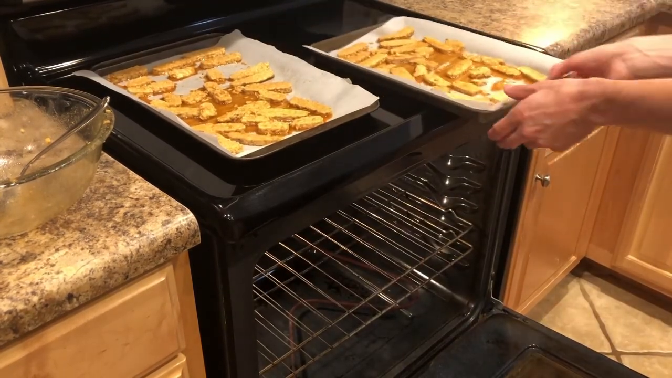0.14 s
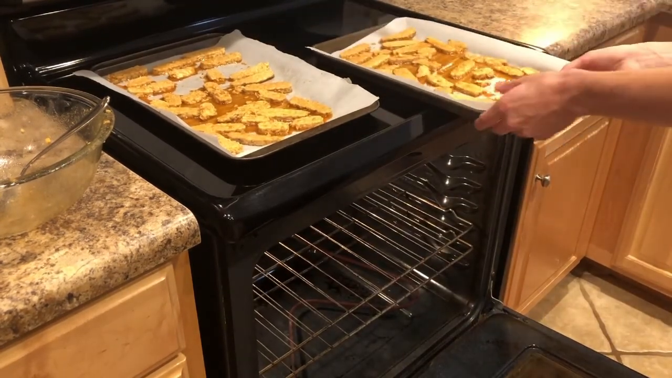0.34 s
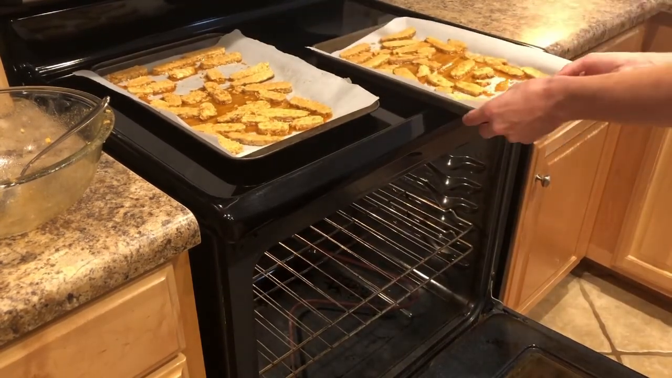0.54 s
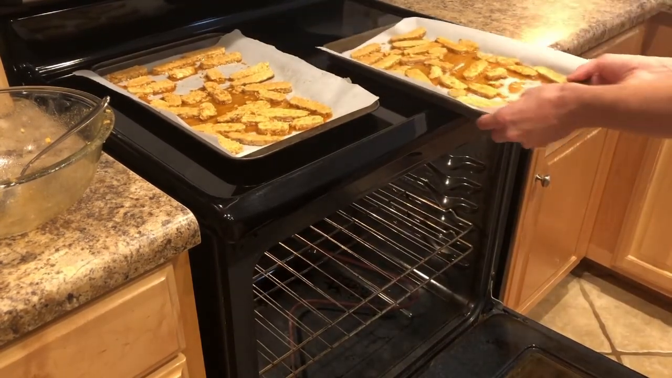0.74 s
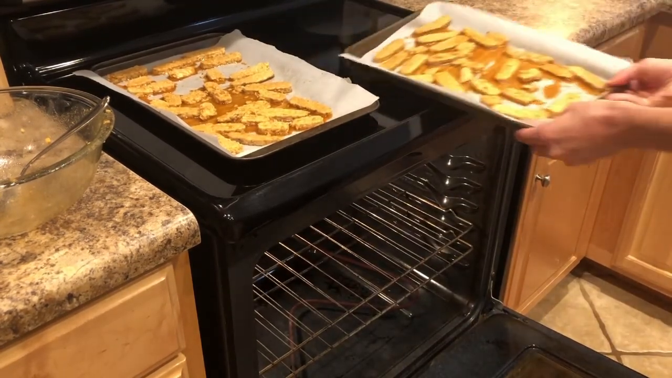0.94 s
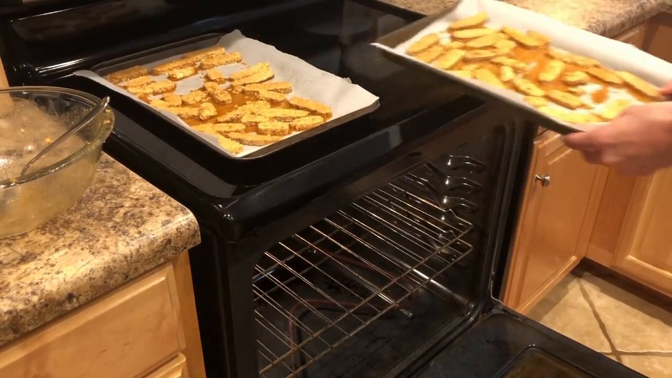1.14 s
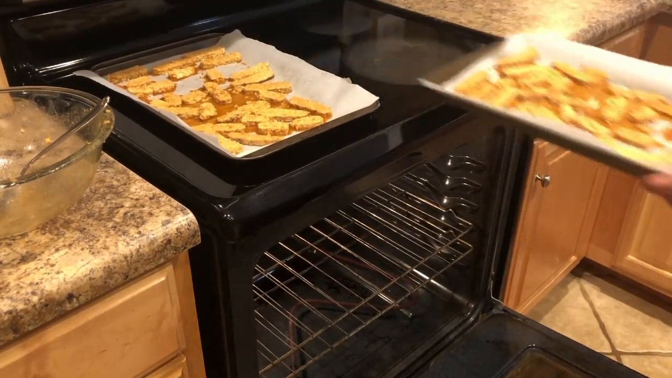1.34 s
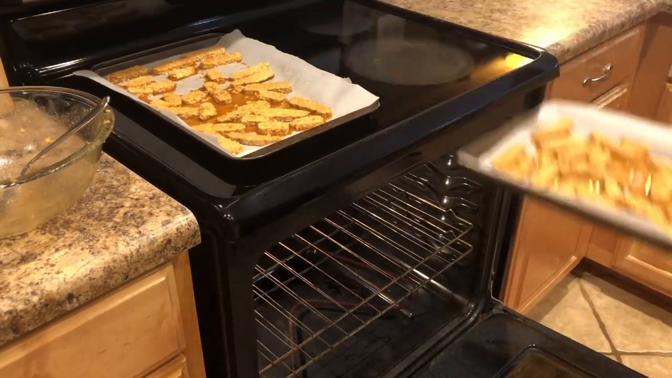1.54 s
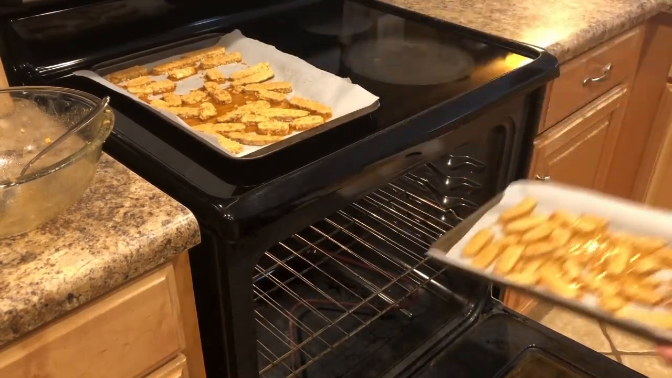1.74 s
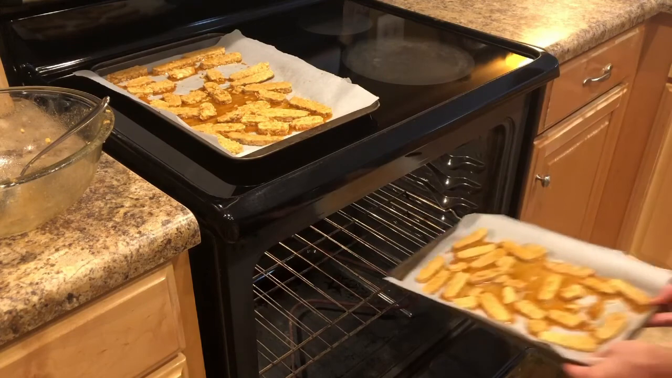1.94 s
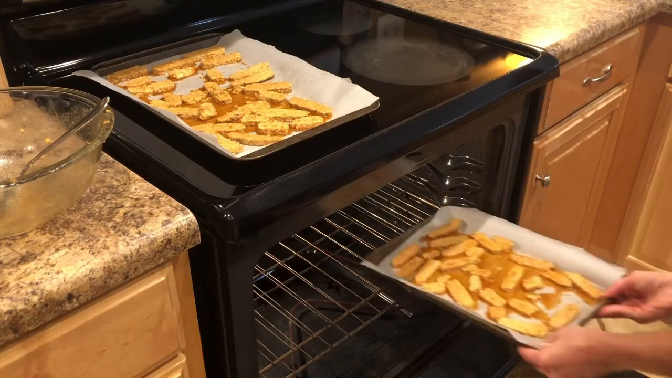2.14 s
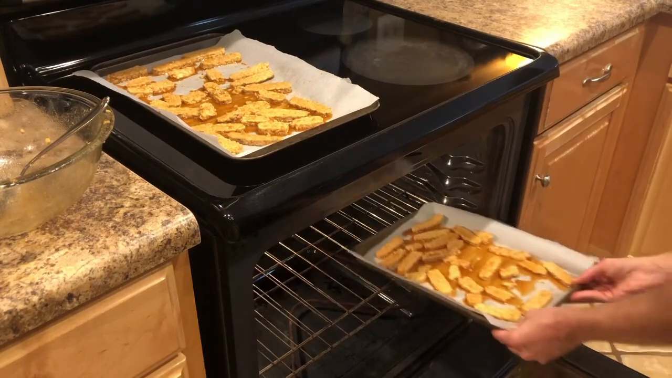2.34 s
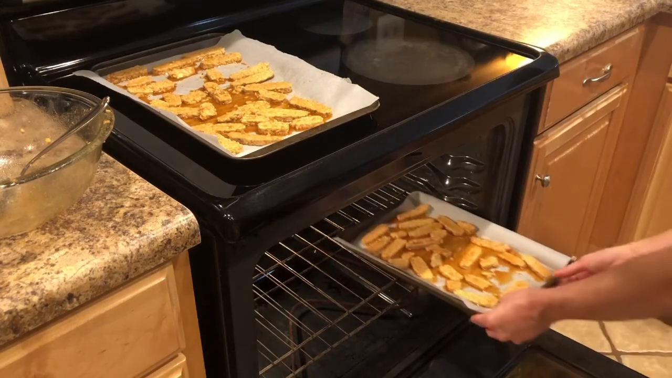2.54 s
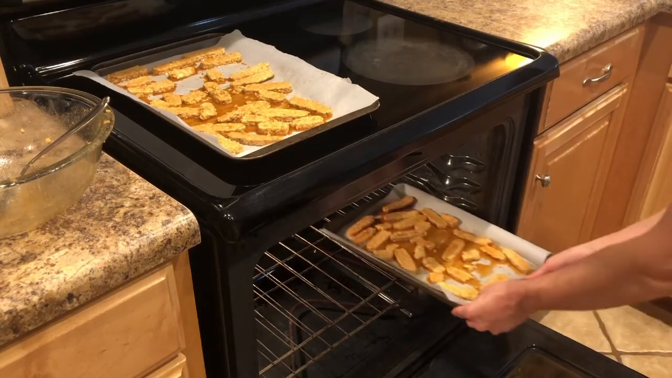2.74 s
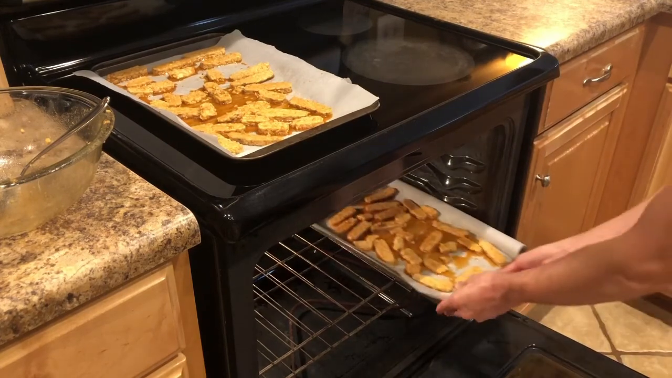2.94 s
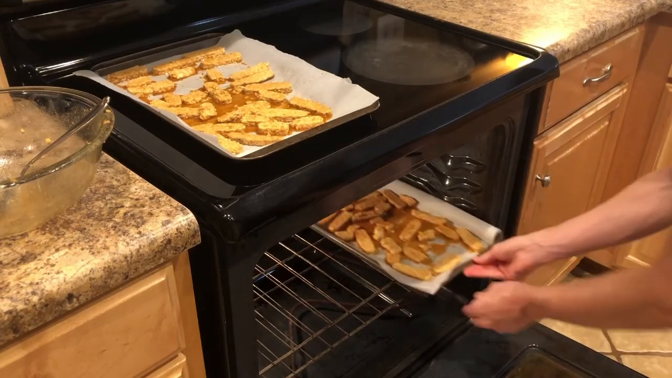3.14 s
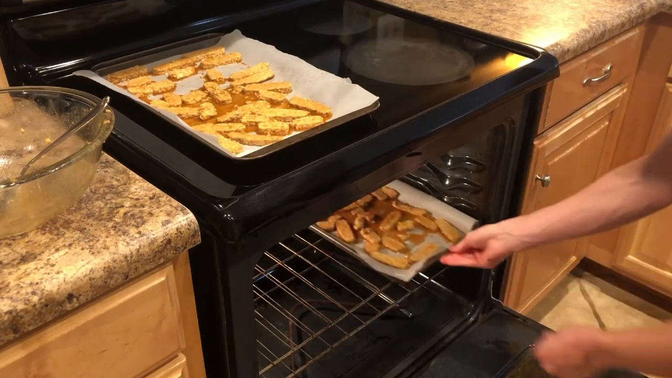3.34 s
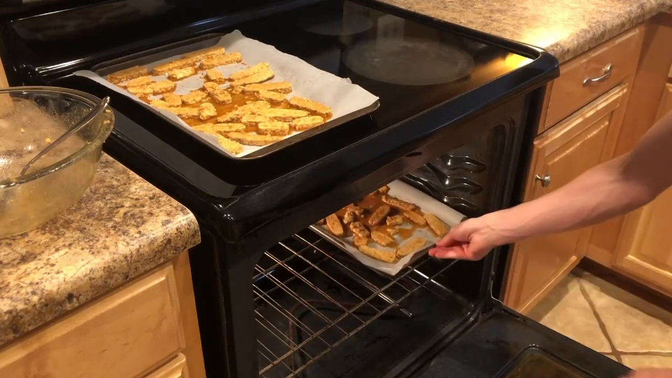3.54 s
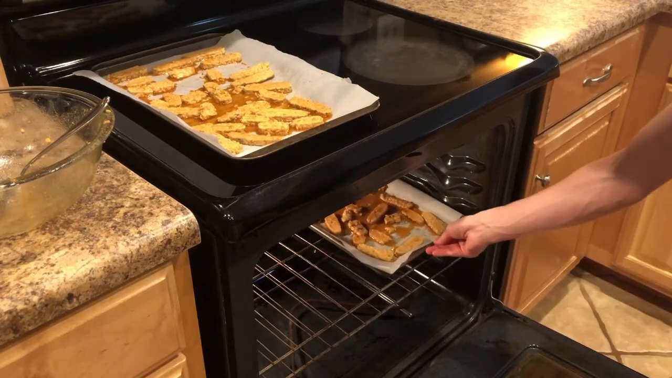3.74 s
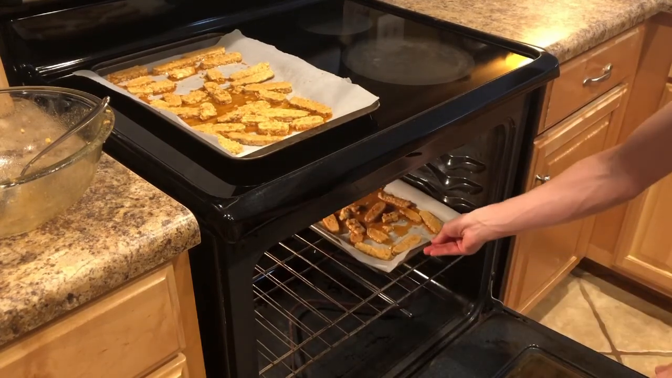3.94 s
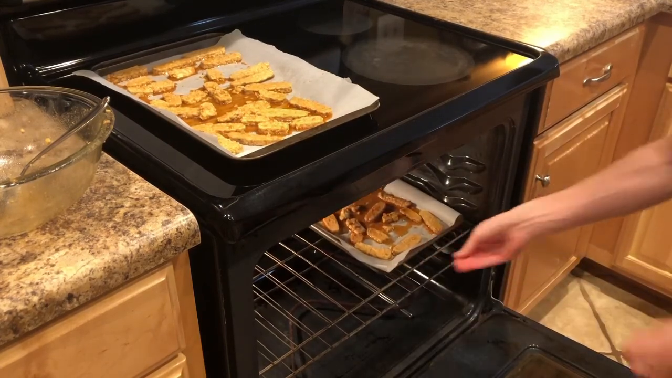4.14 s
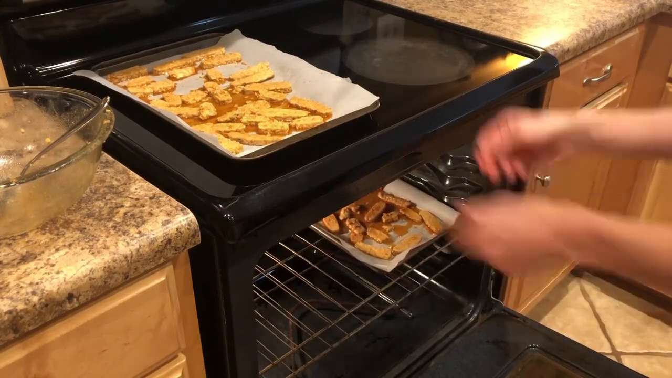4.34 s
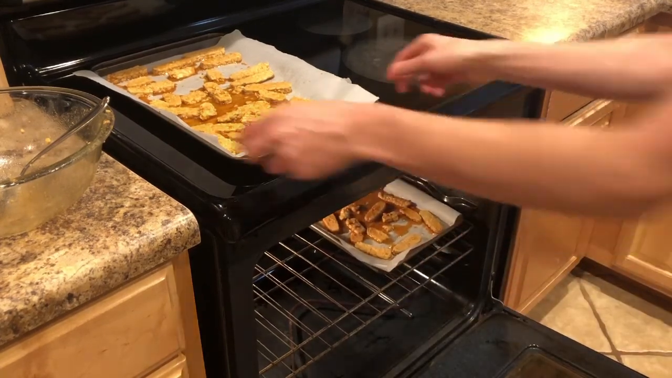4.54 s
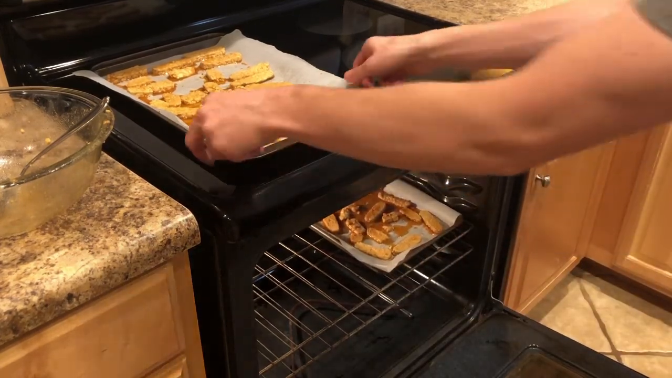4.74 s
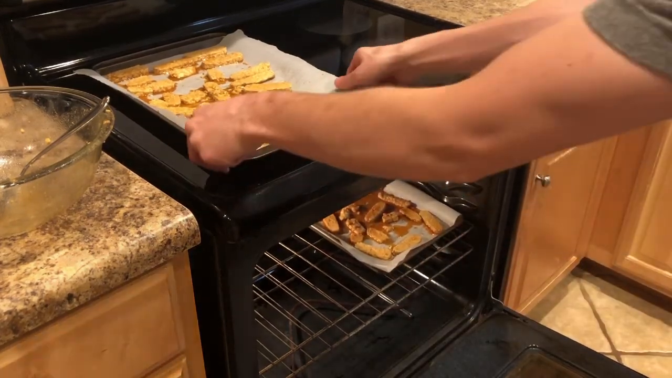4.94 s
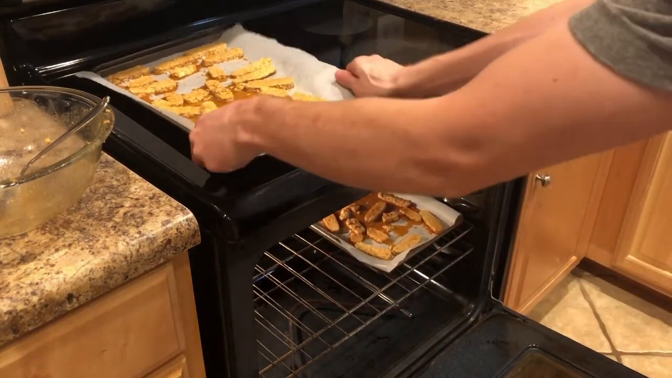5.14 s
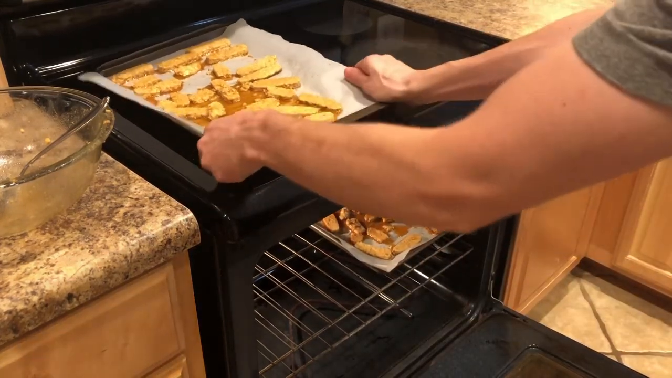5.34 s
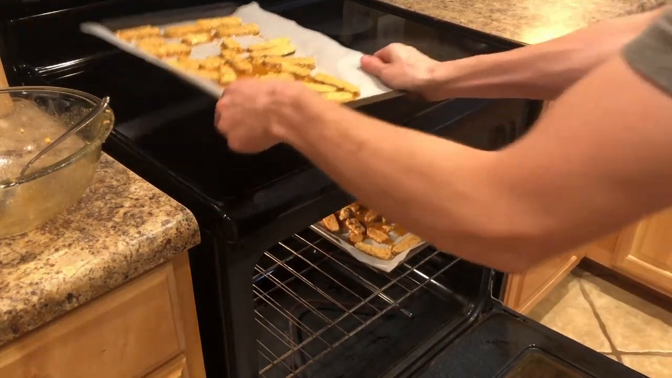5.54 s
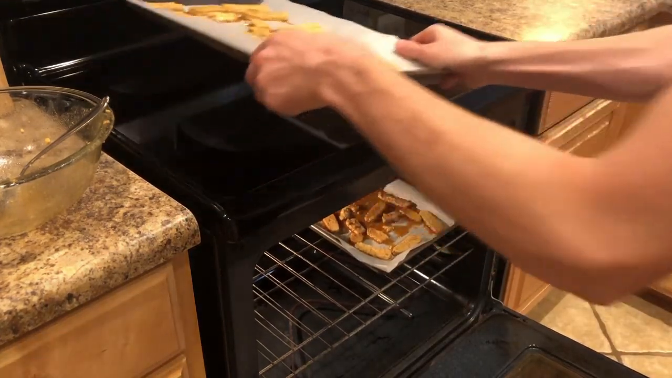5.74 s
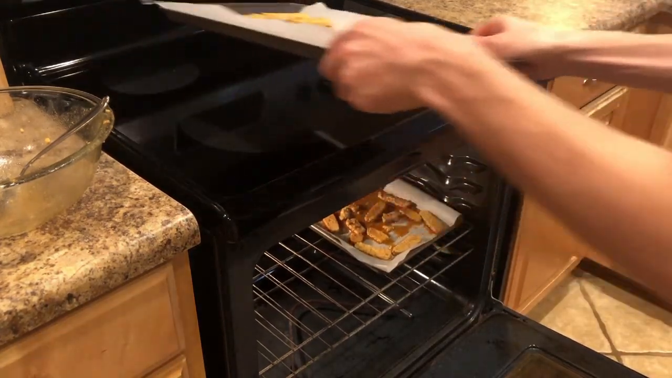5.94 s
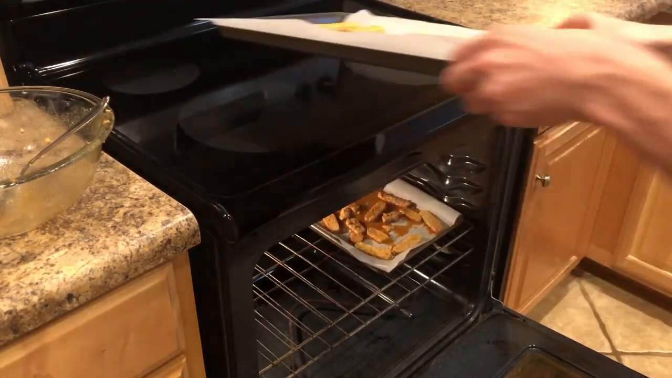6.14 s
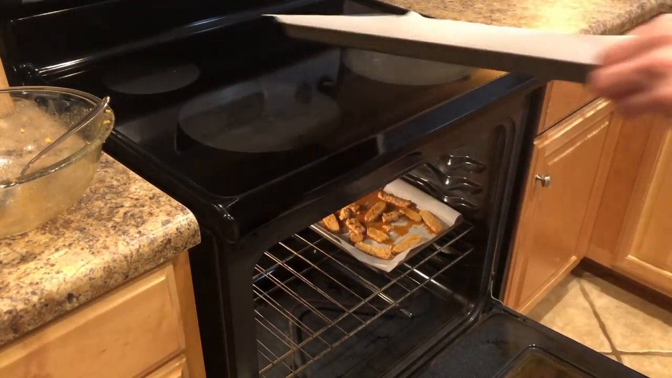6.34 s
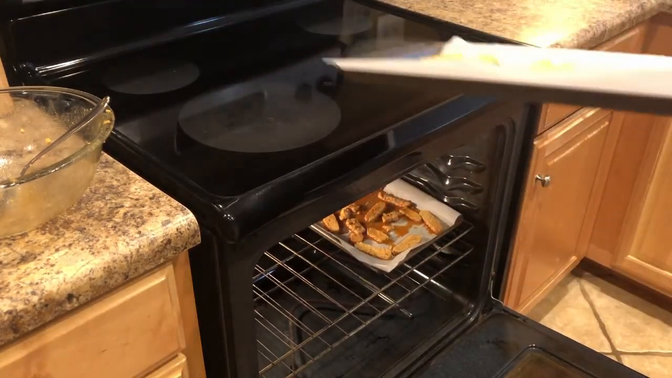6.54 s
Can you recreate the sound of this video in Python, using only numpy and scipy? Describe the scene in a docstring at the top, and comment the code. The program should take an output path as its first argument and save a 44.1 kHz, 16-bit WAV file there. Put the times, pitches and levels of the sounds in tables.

```python
"""A small kitchen, 6.6 s in mono, close by: baking sheets lined with paper go from a glass hob into an oven.
First metal knocks and short scrapes on the hob, built from noisy contact bursts, and light paper snaps.
From 2.3 s hard knocks and slides on the wire rack, also ringing the sheet and oven walls as decaying modes.
A finger, heard faintly at 1.2 s, squeaks at 4.7 s as a gliding tone; then paper crackles in noisy snaps.
Throughout, a room tail of sparse taps, filtered noise for air and the wavering sines of an appliance hum."""
import sys
import numpy as np
from scipy import signal
from scipy.fft import rfft, irfft
from scipy.io import wavfile
from scipy.ndimage import uniform_filter1d

SR = 44100
rng = np.random.default_rng(int(sys.argv[2]) if len(sys.argv) > 2 else 0)


def unload_audio(sound):
    """Save the sound as a 16-bit wav file, at the path given as the first command line argument."""
    columns = np.transpose(np.atleast_2d(sound))
    # keep every value between -1 and 1, then stretch to whole-number steps
    steps = np.round(np.clip(columns, -1, 1) * 32767)
    wavfile.write(sys.argv[1], SR, steps.astype(np.int16))


N = 290619  # samples

# Levels in the tables are relative: the functions and the mix set the final balance.
# metal on rack or hob: start_s, level_db, centre_hz, low part weight_db, bright edge_db, rattle t60_s
KNOCKS = [(0.0074, -23, 1430, -3, -48, 0.083), (0.169, -31, 3880, -13, -8.5, 0.11),
          (0.613, -41, 2460, -36.5, -11, 0.21), (0.634, -45.5, 1400, -31, 7.5, 0.06),
          (0.6591, -43, 1350, -31, -8, 0.2), (0.9597, -37.5, 1750, -2, -17.5, 0.068),
          (1.009, -28, 2060, -16, -11.5, 0.038), (2.3148, -19.5, 3470, -20, 0.5, 0.14),
          (2.337, -9.5, 3350, -20, -5, 0.18), (2.3583, -10.5, 2480, -14, -29.5, 0.14),
          (2.3846, -17, 1394, -13, -4.5, 0.51), (2.4259, -11, 4150, -35, -3.5, 0.091),
          (2.4449, -22, 3460, -24, -9, 0.33), (2.7829, -30, 2500, -5, -2, 0.037),
          (2.9383, -27, 2220, -15.5, -7, 0.039), (3.0825, -16.5, 3140, -11.5, -15.5, 0.16),
          (3.173, -30.5, 2900, -22, -2, 0.1), (3.2603, -28, 1890, -19, -19, 0.053),
          (3.3496, -27.5, 3480, -19, -2.5, 0.055), (3.3747, -25, 3740, -44, 3, 0.042),
          (3.5332, -25, 3700, -6.5, -11.5, 0.082), (3.8375, -34, 1500, -11.5, -36, 0.22),
          (3.967, -23, 1520, -16.5, -27, 0.097), (5.1685, -30.5, 1130, -4, -25, 0.091),
          (5.2799, -28.5, 1070, -4, -32.5, 0.075), (6.2925, -28, 2947, -17, -8.5, 0.038)]
# low part of a knock: frequency_hz, level_db
WEIGHT = [(90, -21), (150, -2.5), (400, 2.5), (800, -8), (1300, -19)]
# blows that swing the panel: start_s, level_db, favoured_hz, reach_octaves (6 dB down there)
THUDS = [(.01, -33.5, 825, .1), (.012, -35.5, 392, 0.11), (.012, -35, 1746, .1), (0.17, -33.5, 180, 0.068),
         (.66, -43.5, 158, 0.15), (.9, -43, 158, 0.21), (.958, -31, 260, .1), (.975, -41, 161, 0.17),
         (.96, -47, 1746, .1), (1.013, -45.5, 825, .1), (2.316, -26, 3500, 0.09),
         (2.338, -19.5, 3500, 0.091), (2.427, -25.5, 3600, 0.089), (2.361, -31, 128, .1),
         (2.379, -26.5, 535, .1), (2.431, -31, 392, 0.114), (2.49, -30, 825, .1), (2.655, -38, 128, 0.087),
         (2.657, -31, 260, 0.118), (2.702, -41, 158, 0.12), (3.089, -39, 335, 0.086), (3.541, -45, 335, .1),
         (3.97, -47, 2870, .1), (4.049, -45, 140.3, 0.31), (5.169, -38, 1113, .1), (5.284, -43.5, 535, .1),
         (5.289, -42, 158, 0.14)]
# clear swings of the flat of the sheet: frequency_hz, t60_s on the rack
PANEL = [(128, 0.26), (158, 0.25), (180, 0.35), (260, 0.095), (335, .18), (392, 0.22), (535, 0.14),
         (825, 0.22), (1113, 0.11), (1746, 0.24), (2870, 0.29), (3400, .12), (3620, .12)]
# sheet and rack ringing together: frequency_hz, level_db, t60_s
SHEET_MODES = [(380, -4, 5.0), (510.6, -3, 0.29), (850, -9, 5.0), (1010, 2.5, 0.87), (1516, -4.5, 0.83),
               (1800, 4, 0.41), (2064, -12, 0.31), (2190, -3.5, 0.46), (2814, -0.5, 0.41),
               (3070, -12, 0.85), (3537, -20.5, 0.25), (3440, -36.5, 1.2), (3420, -6.5, 0.72),
               (3740, 0, 0.2), (3800, 0.5, 0.52), (3820, -6, 0.52), (4526, -19, 0.49), (4940, -17, 0.55),
               (5100, -16, 0.55), (5260, -14, 0.83), (5330, -21, 0.68), (5940, -7.5, 0.33),
               (6800, -24, 0.38), (6520, -11, 0.37), (7100, -11, 0.16), (7149, -15, 0.42), (7990, -8, 0.21),
               (7400, -14, 0.53), (7300, -6, 0.16), (7450, -25, 0.38)]
# walls of the oven: frequency_hz, level_db, t60_s
OVEN_MODES = [(158.4, -15.5, 0.22), (273, -3.5, 0.18), (327, -1, .5), (490, -9.5, .3), (733, 0, 0.36)]
# strokes of sheet or paper over rack and hob: full_at_s, hold_s, swell_db_per_s, fade_db_per_s,
# scrape_db, rumble_db and edge_db (both relative to the scrape)
STROKES = [(0.071, 0.0147, 144, 142, -50, -2.5, -5), (0.222, 0.0084, 77, 221, -48, -7.5, -7.5),
           (0.39, 0.049, 400., 200., -77.5, 3, 6), (0.682, 0.042, 176, 41, -73, 7.5, -20),
           (0.88, .01, 104, 110., -53, -23, -7.5), (1.08, 0.055, 100., 57, -70.5, -5, -12),
           (1.257, 0.057, 500., 120., -70.5, -12, -30), (2.458, 0.035, 394, 350., -33.5, -6.5, -8),
           (2.577, 0.021, 108, 20.5, -43, -1.5, -4.5), (3.154, 0.087, 49, 77, -44, -3.5, 0),
           (3.44, .09, 60., 200., -51, -19, -2), (3.554, 0.012, 400., 119, -50.5, 5, -32),
           (3.81, .07, 152, 134, -59, 2.5, -8), (3.992, 0.0176, 400., 37.5, -62, 10, -12),
           (4.838, 0.028, 299.5, 58, -64.5, 2.5, -1), (5.04, 0.047, 100., 103, -62.5, -1.5, -2),
           (5.187, .005, 900., 900., -47, -16, 1), (5.24, 0.09, 100., 70., -63.5, 8, -6),
           (5.78, 0.14, 18, 33.5, -69, -16, -2), (6.283, 0.021, 29, 59.5, -68, 1, -5)]
# spectra of the scraping and of its low rumble: frequency_hz, level_db
SCRAPE = [(410, -27.5), (700, 3), (778, -18), (874, -3.5), (1160, 1), (2650, 4.5), (3300, 5.5), (7000, -10),
          (9100, -62), (15400, -120)]
RUMBLE = [(41, -39), (70, -19.5), (130, 7), (230, -5), (268, 5.5), (522, -1.5), (581, -7), (850, -3),
          (1200, -14.5), (1560, -12), (2640, -120)]
# bright edge of knocks, snaps and strokes: frequency_hz, level_db
EDGE = [(3240, -12.5), (5500, -2), (6670, 0), (8320, -2.5), (15100, -5.5), (16100, 0), (16500, -52.5)]
# paper snaps and light ticks: start_s, level_db, centre_hz, bright edge_db
SNAPS = [(0.8803, -39.5, 1900, -8), (1.25, -41.5, 1770, -51), (1.323, -45.5, 1920, -46),
         (1.5328, -50, 1840, -36), (1.6591, -27, 3840, -6), (1.6866, -37, 3220, 0.5),
         (1.9323, -29, 3500, -34.5), (2.136, -35, 2700, -47), (2.2852, -38, 3520, -18),
         (4.1682, -47, 1730, -20), (4.26, -47, 1772, -6.5), (4.8006, -39, 1920, -5),
         (4.821, -31.5, 2860, -3), (4.9244, -47, 1510, -19.5), (5.0038, -38.5, 2100, -25.5),
         (5.033, -33, 2890, -3), (5.093, -33, 5320, -5), (5.1448, -32.5, 3000, -10), (5.189, -22, 3030, 0),
         (5.1996, -35, 2960, -7), (5.229, -27, 2530, -4), (5.282, -38, 3060, 6.5),
         (5.314, -27.5, 3580, -23), (5.3368, -43, 3760, 11.5), (5.393, -37, 4060, -3),
         (5.4434, -39.5, 4410, -9), (5.542, -38.5, 3599, -15), (5.579, -40, 3540, 0.5),
         (5.687, -40, 4230, -14), (5.7497, -31.5, 4200, -9.5), (5.8643, -43.5, 1525, -9.5),
         (6.002, -43, 2000, -10), (6.122, -40.5, 2960, -34), (6.1458, -29.5, 2850, 2.5),
         (6.2396, -28, 4250, -26.5), (6.335, -32, 3260, -14), (6.4236, -44, 2980, -9),
         (6.543, -46.5, 5340, -2)]
# finger sticking and slipping on the sheet: start_s, length_s, first_hz, last_hz, peak_db, swell_share of length
SQUEAKS = [(1.222, 0.035, 1080, 1090, -56.5, .45), (4.7, 0.098, 257.7, 462, -42.5, 0.97),
           (4.798, .035, 387, 457, -49, 0.65), (5.87, 0.047, 1443, 1270, -57, 0.29)]
# overtone of a squeak, strong at slow slips: pitch_hz, level_db
OCTAVE = [(265, 3.5), (285, 3), (330, -8), (430, -23)]
# decay of the room: frequency_hz, t60_s
KITCHEN_DECAY = [(150, 0.56), (800, 0.51), (2000, 0.58), (5500, 0.31), (14000, 0.2)]
# spectrum of the room noise: frequency_hz, level_db
AIR = [(15, -43), (25, -21), (64, -1.5), (293, -9), (344, -6), (405, -11.5), (714, -17.5), (775, -17.5),
       (1160, -23.5), (1790, -23), (3620, -28.5), (12200, -41), (16000, -61.5)]
# partials of the appliance hum: frequency_hz, level_db
HUM = [(59, -64.5), (119, -70), (178, -72), (240, -73.5), (266, -76), (353, -69), (590, -80.5)]
# rise of the hum and its sinking towards the end: time_s, level_db
HUM_FADE = [(0, -0.5), (4.8, 3), (5.6, 1), (6.59, -1)]

ON_RACK_FROM_S, ON_RACK_TO_S = 2.2, 4.6  # the sheet lies on the oven rack between these times
HELD_TIME_SHARE = 0.45  # share of the panel's ring time left while hands or the hob damp the sheet
HELD_RING_DB = -10  # the sheet rings less while it is held
SWING_CYCLES = 1.4  # time constant, in cycles, of a panel mode building up
CRACKLE_CYCLES = 116  # a crackle dies by 60 dB in this many cycles of its centre, within the limits of burst()
TICKS_FROM_S, TICKS_TO_S, TICK_COUNT = 4.3, 4.76, 5
TICK_DB, TICK_SPREAD_DB, TICK_EDGE_DB = -53, 1.5, -6.5
GLIDE_BEND = 1.2  # exponent above 1: the glide quickens
SWELL_DB, SLIP_DB = 15, 15.5  # gained before the peak of a squeak, lost after it
SLIP_JITTER = 0.033  # rms unevenness of the slips, share of the pitch
AIR_DB = -65  # mean room noise
BAND_LIMIT_HZ = 15900


def gain_of(db):
    """Amplitude factor for a level in dB."""
    return 10 ** (np.asarray(db) / 20)


def evened(x):
    """Scales x to rms 1."""
    return x / np.sqrt(np.mean(x ** 2) + 1e-20)


def read(points, hz):
    """Reads a curve between its points, along log frequency."""
    f, value = np.transpose(points)
    return np.interp(np.log(hz + 1), np.log(f + 1), value)


def add(mix, start_s, sound):
    """Lays a sound into the mix, cut at its end."""
    part = mix[round(start_s * SR):][:len(sound)]
    part += sound[:len(part)]


def coloured(x, spectrum):
    """Filters x by the spectrum, silent outside its ends, rms 1."""
    hz = np.fft.rfftfreq(len(x), 1 / SR)
    inside = (hz > spectrum[0][0]) & (hz < spectrum[-1][0])
    return evened(irfft(rfft(x) * gain_of(read(spectrum, hz)) * inside, len(x)))


def wander(per_s):
    """Slow random drift of rms 1, with per_s turning points a second."""
    steps = rng.standard_normal(1000)
    return evened(np.interp(np.arange(N) * per_s / SR, np.arange(1000), steps))


def grit(size, spread_db, per_s):
    """Tiny asperity impacts of uneven size at random moments."""
    sizes = gain_of(spread_db * np.minimum(rng.exponential(1, size), 4))
    struck = rng.random(size) < per_s / SR
    return sizes * rng.standard_normal(size) * struck


def burst(t60_s, rise_s):
    """Envelope of a contact: quick rise, exponential fall, t60 held within 5 to 400 ms."""
    t = np.arange(8192) / SR
    return (1 - np.exp(-t / rise_s)) * gain_of(-60 * t / np.clip(t60_s, .005, .4))


def knocks():
    """Each knock is a short rattle of contacts; its low part fades in a little faster but lasts longer."""
    out = np.zeros(N)
    for start_s, level_db, hz, weight_db, edge_db, t60_s in KNOCKS:
        rattle = grit(8192, 3.1, 20000.)
        hump = [(400, -20), (900, -6), (0.44 * hz, -4), (hz, 0), (1.47 * hz, -4), (8000, -15), (15500, -36)]
        body = coloured(rattle, hump) + gain_of(edge_db) * coloured(rattle, EDGE)
        low = gain_of(weight_db) * coloured(rattle, WEIGHT)
        knock = body * burst(t60_s, 0.002) + low * burst(1.67 * t60_s, 0.0017)
        add(out, start_s, gain_of(level_db - 9.0) * knock)
    return out


def thuds():
    """Damped swings of the panel: each blow moves the modes near the pitch it favours."""
    out = np.zeros(N)
    t = np.arange(8192) / SR
    for start_s, level_db, favoured_hz, reach in THUDS:
        time_share = 1 if ON_RACK_FROM_S < start_s < ON_RACK_TO_S else HELD_TIME_SHARE
        thud = np.zeros(len(t))
        for hz, t60_s in PANEL:
            mode_db = level_db - 6 * (np.log2(hz / favoured_hz) / reach) ** 2
            swing = np.sin(2 * np.pi * hz * t)
            thud += gain_of(mode_db) * swing * burst(time_share * t60_s, SWING_CYCLES / hz)
        add(out, start_s, thud)
    return out


def ringing(x, modes):
    """Metal modes rung by x: each is a close beating pair, its t60 at most 0.32 s."""
    t = np.arange(SR // 2) / SR
    pairs = rng.random((len(modes), 2))
    ring = np.zeros(len(t))
    for (hz, level_db, t60_s), (phase, detune) in zip(modes, pairs):
        first = np.sin(2 * np.pi * hz * t + 2 * np.pi * phase)
        second = np.sin(2 * np.pi * hz * (1 + .006 * detune) * t)
        ring += gain_of(level_db - 60 * t / min(t60_s, .32)) * (first + second)
    return signal.oaconvolve(x, ring / np.linalg.norm(ring))[:N]


def patchy(x, spread_db):
    """Resonances that come and go as the contact moves from wire to wire."""
    z = signal.stft(x, nperseg=512, noverlap=384)[2]
    across_pitch = uniform_filter1d(rng.standard_normal(z.shape), size=5, axis=0)
    patches = uniform_filter1d(across_pitch, size=14, axis=1)
    changed = z * gain_of(spread_db * evened(patches))
    return evened(signal.istft(changed, nperseg=512, noverlap=384)[1][:N])


def slides():
    """Dense grit under an uneven hand, with small catches, heard as scrape, rumble and edge."""
    t = np.arange(N) / SR
    catches = signal.oaconvolve(abs(grit(N, 1.3, 50.0)), burst(0.026, 0.00091))[:N]
    hand = gain_of(1.1 * wander(60.))
    rough = patchy(grit(N, 2.4, 15000.), 2.1) * hand * (1 + 0.4 * catches)
    layers = [coloured(rough, spectrum) for spectrum in (SCRAPE, RUMBLE, EDGE)]
    power = np.zeros((3, N))  # overlapping strokes add in power
    for full_s, hold_s, swell, fade, scrape_db, rumble_db, edge_db in STROKES:
        before_s = np.maximum(full_s - t, 0)
        after_s = np.maximum(t - full_s - hold_s, 0)
        shape = gain_of(scrape_db - swell * before_s - fade * after_s)
        power += (shape * gain_of([[0], [rumble_db], [edge_db]])) ** 2
    return (layers * np.sqrt(power)).sum(0)


def snaps():
    """Each snap is one clean crack and a short crackle around one broad resonance."""
    out = np.zeros(N)
    click = signal.unit_impulse(8192, idx=40)
    for start_s, level_db, hz, edge_db in SNAPS + ticks():
        hump = [(700, -30), (.5 * hz, -9), (hz, 0), (1.32 * hz, -6), (12000, -22)]
        grains = grit(8192, 0.79, 20000.)
        crack = coloured(click, hump) + gain_of(edge_db) * coloured(click, EDGE)
        crackle = coloured(grains, hump) + gain_of(edge_db) * coloured(grains, EDGE)
        snap = 0.028 * crack * burst(0.02, 0.00024)
        snap += 1.046 * crackle * burst(CRACKLE_CYCLES / hz, 0.0012)
        add(out, start_s, gain_of(level_db - 11) * snap)
    return out


def ticks():
    """A row of faint snaps, loosely spaced, as rows like those of SNAPS."""
    late, loud, high = rng.random((TICK_COUNT, 3)).T
    start_s = TICKS_FROM_S + (TICKS_TO_S - TICKS_FROM_S) * (np.arange(TICK_COUNT) + late) / TICK_COUNT
    level_db = TICK_DB + TICK_SPREAD_DB * (2 * loud - 1)
    centre_hz = 2098 * (0.56 + 0.37 * high)
    return [(s, db, hz, TICK_EDGE_DB) for s, db, hz in zip(start_s, level_db, centre_hz)]


def squeaks():
    """A finger's nearly regular slips on the sheet give a gliding pitch and its octave."""
    out = np.zeros(N)
    for start_s, length_s, first_hz, last_hz, peak_db, swell_share in SQUEAKS:
        u = np.linspace(0, 1, round(length_s * SR))
        peak_at = np.clip(swell_share, .05, .95)
        hz = first_hz + (last_hz - first_hz) * u ** GLIDE_BEND
        uneven = evened(uniform_filter1d(rng.standard_normal(len(u)), size=200))
        phase = 2 * np.pi * np.cumsum(hz * (1 + SLIP_JITTER * uneven)) / SR
        tone = np.sin(phase) + gain_of(read(OCTAVE, hz)) * np.sin(2 * phase)
        level_db = peak_db + np.interp(u, [0, peak_at, 1], [-SWELL_DB, 0, -SLIP_DB])
        add(out, start_s, gain_of(level_db) * tone * signal.windows.tukey(len(u), .2))
    return out


def kitchen(x):
    """Room tail: sparse taps of random sign, each band dying at its own speed."""
    taps = np.zeros(SR)
    at = np.arange(140, SR - 20, 20)  # the first reflection comes after about 3 ms
    taps[at + rng.integers(0, 20, len(at))] = rng.choice([-1., 1.], len(at))
    hz, t, z = signal.stft(taps, SR, nperseg=256)
    decay = gain_of(-60 * t / read(KITCHEN_DECAY, hz)[:, None])
    tail = signal.istft(z * decay, SR, nperseg=256)[1]
    return signal.oaconvolve(x, tail / np.linalg.norm(tail))[:N]


def kitchen_air():
    """Low filtered room noise, and an appliance hum of sines wavering in level and phase."""
    t = np.arange(N) / SR
    air = gain_of(AIR_DB + 0.42 * wander(1.0)) * coloured(rng.standard_normal(N), AIR)
    hum = np.zeros(N)
    for hz, level_db in HUM:
        level = gain_of(level_db + 1.2 * wander(6.6))
        hum += level * np.sin(2 * np.pi * hz * t + 0.9 * wander(6.9))
    return air + hum * gain_of(np.interp(t, *np.transpose(HUM_FADE)))


def scene():
    """Metal excites the sheet and, while on the rack, the oven; all but the air feeds the room tail."""
    blows, rubbing = knocks(), slides()
    t = np.arange(N) / SR
    on_rack = (t > ON_RACK_FROM_S) & (t < ON_RACK_TO_S)
    sheet_drive = gain_of(-18.0 + HELD_RING_DB * ~on_rack) * blows + gain_of(-27.0) * rubbing
    oven_drive = on_rack * (gain_of(-22.0) * blows + gain_of(-21.0) * rubbing)
    sheet = ringing(sheet_drive, SHEET_MODES)
    walls = ringing(oven_drive, OVEN_MODES)
    metal = blows + thuds() + rubbing + sheet + walls
    light = snaps() + squeaks()
    room = kitchen(gain_of(-8.5) * metal + gain_of(-5.5) * light)
    return (metal + light + room + kitchen_air())[None]


def record(dry):
    """The microphone channel: a steep low-pass at the band limit."""
    low_pass = signal.firwin(511, BAND_LIMIT_HZ, window=("kaiser", 9), fs=SR)
    return signal.oaconvolve(dry, low_pass[None], "same")


dry = scene()
out = record(dry)
unload_audio(out)
```